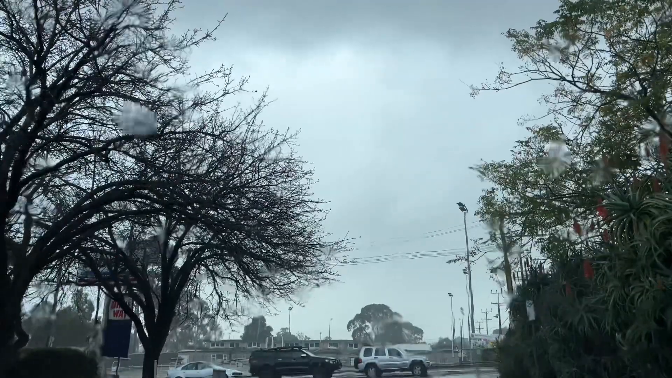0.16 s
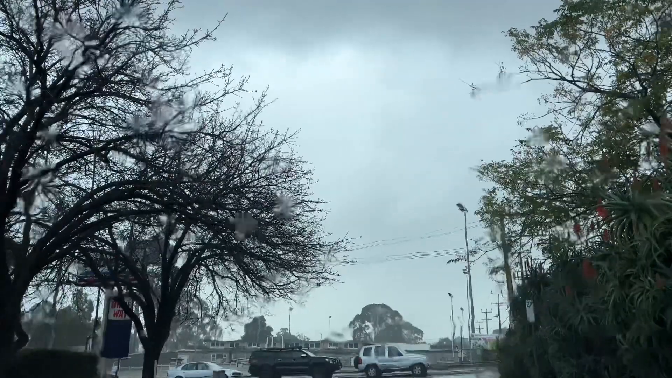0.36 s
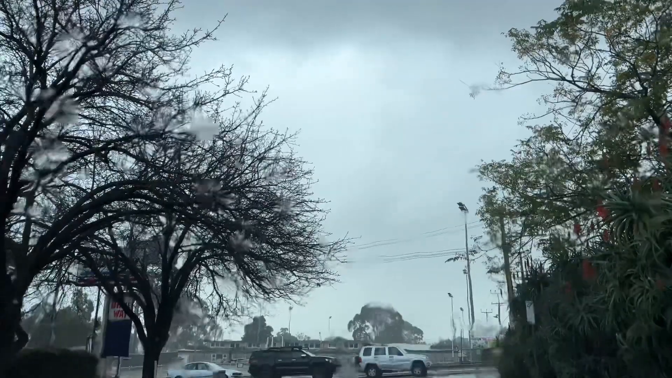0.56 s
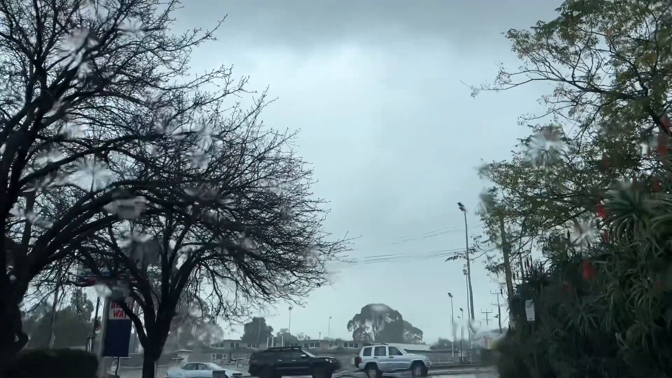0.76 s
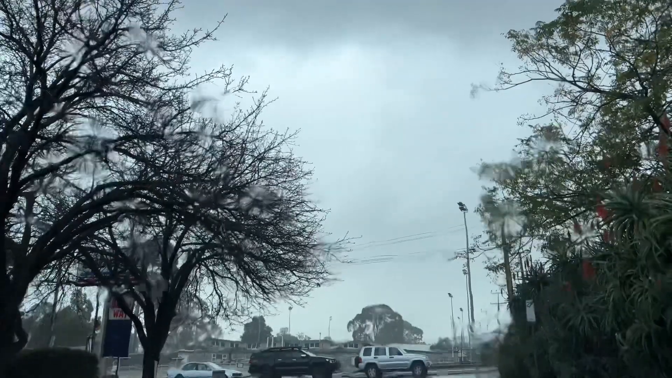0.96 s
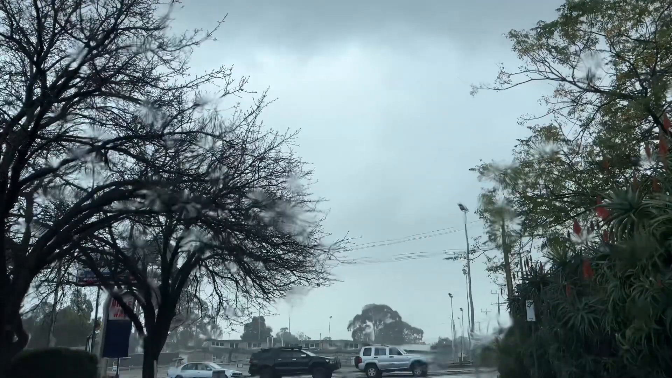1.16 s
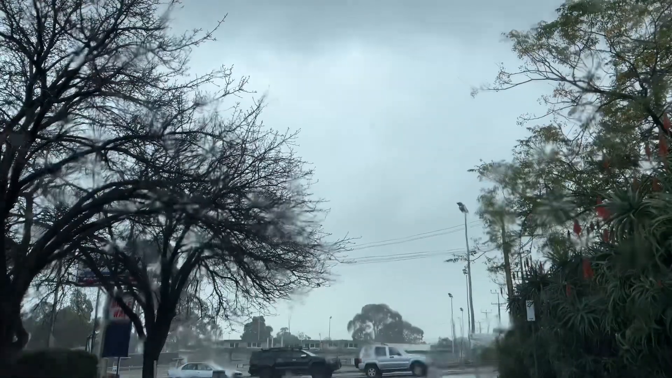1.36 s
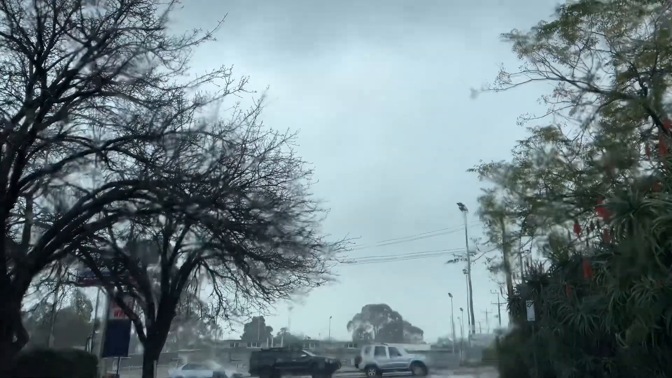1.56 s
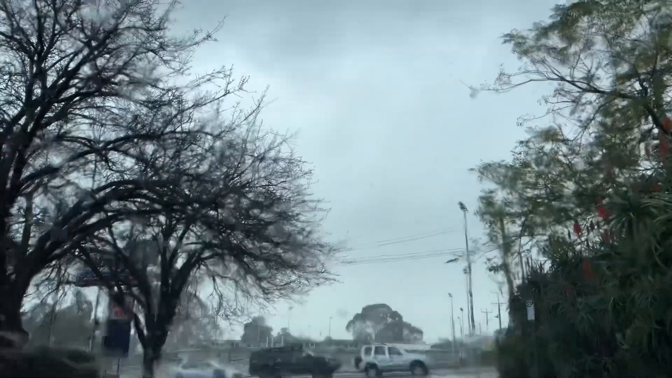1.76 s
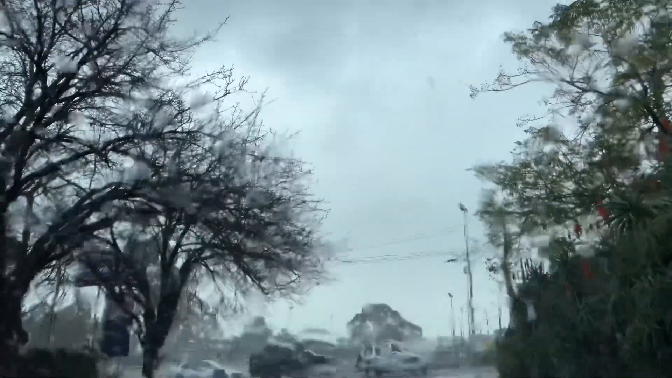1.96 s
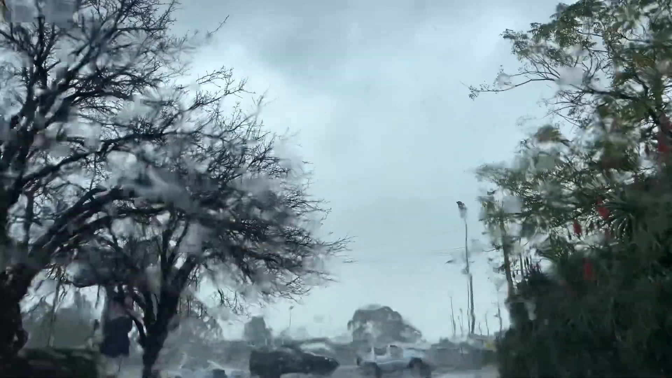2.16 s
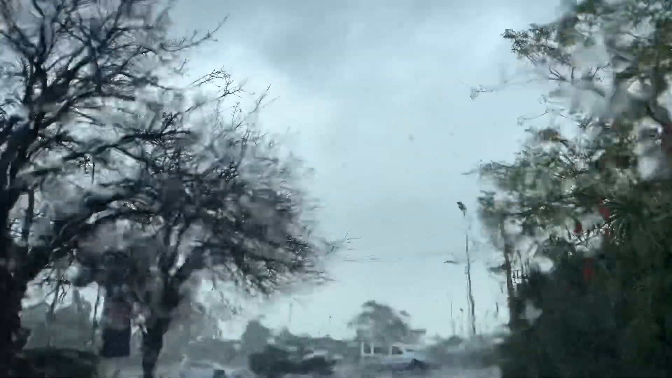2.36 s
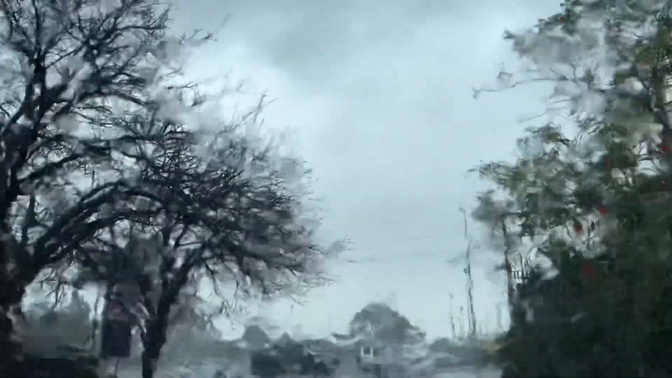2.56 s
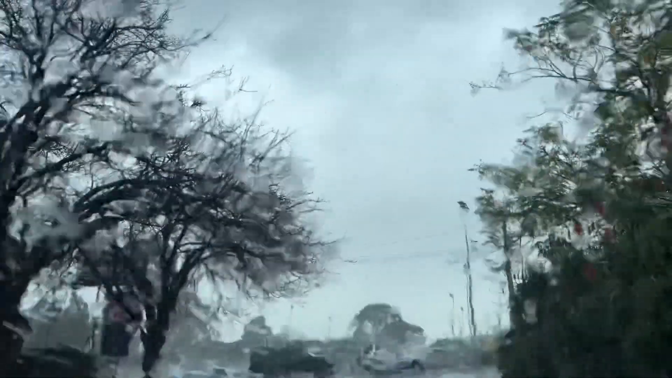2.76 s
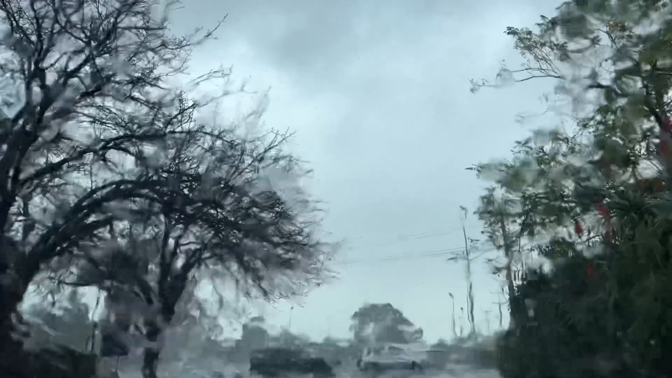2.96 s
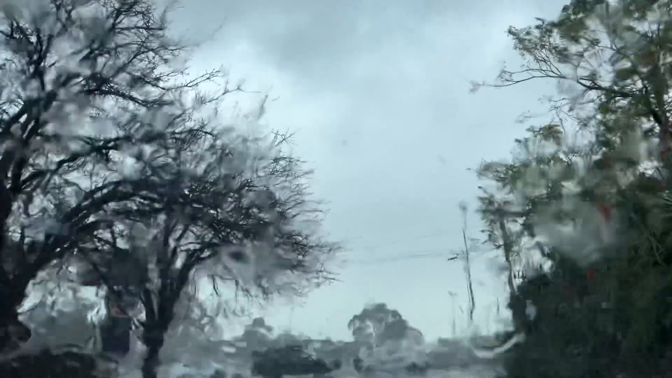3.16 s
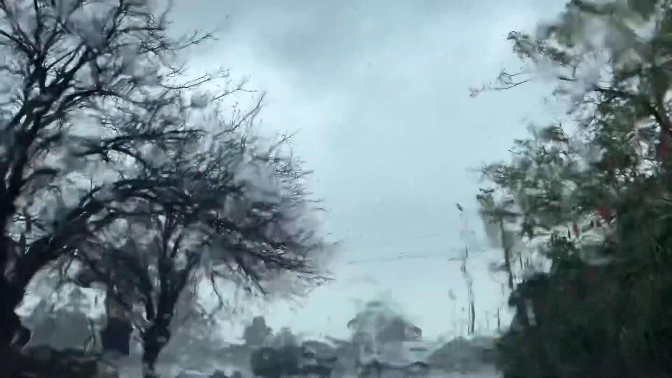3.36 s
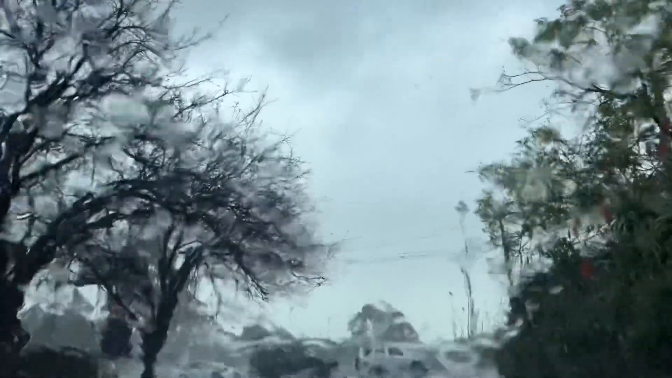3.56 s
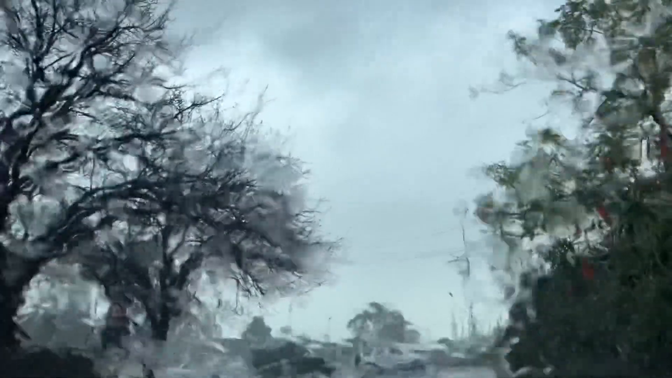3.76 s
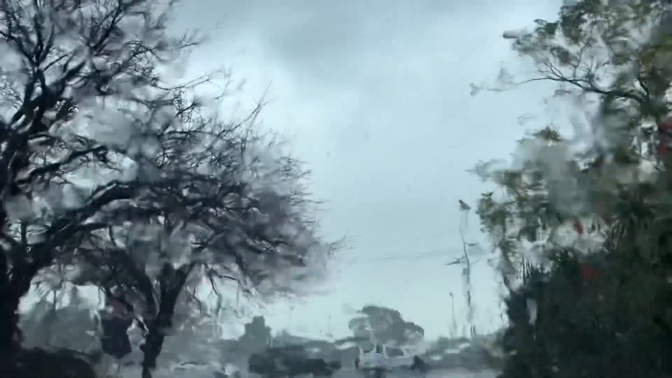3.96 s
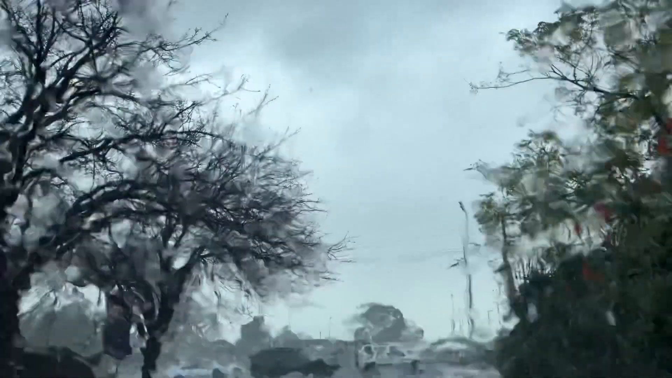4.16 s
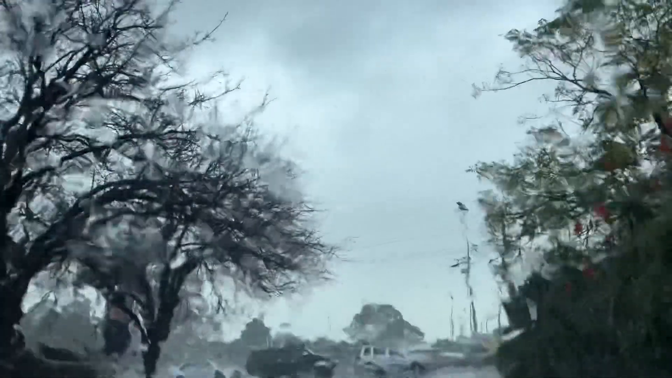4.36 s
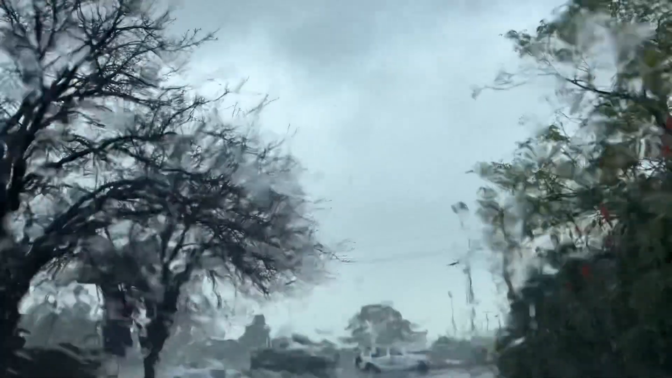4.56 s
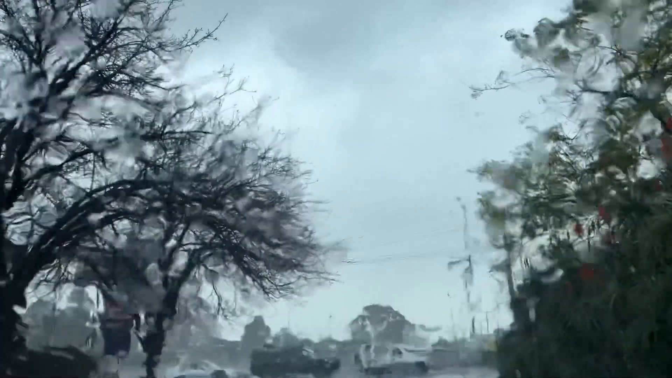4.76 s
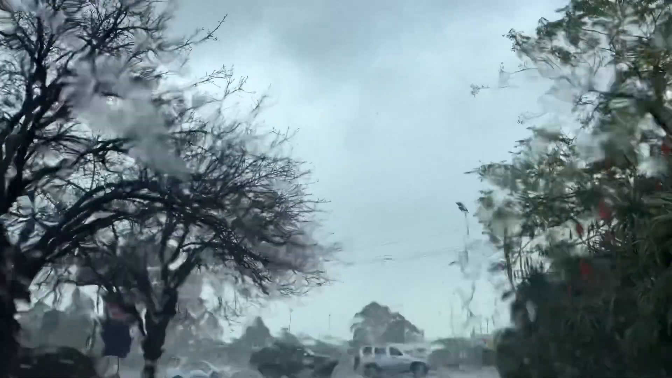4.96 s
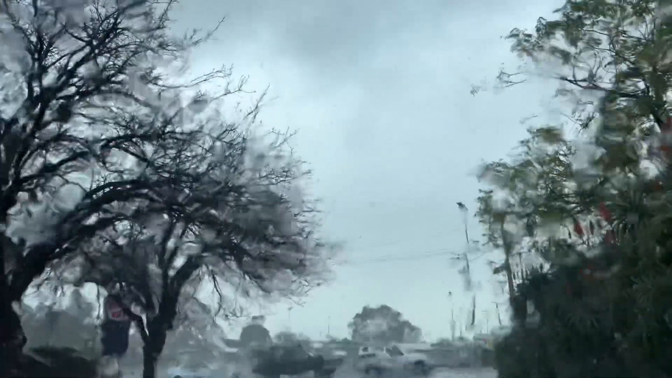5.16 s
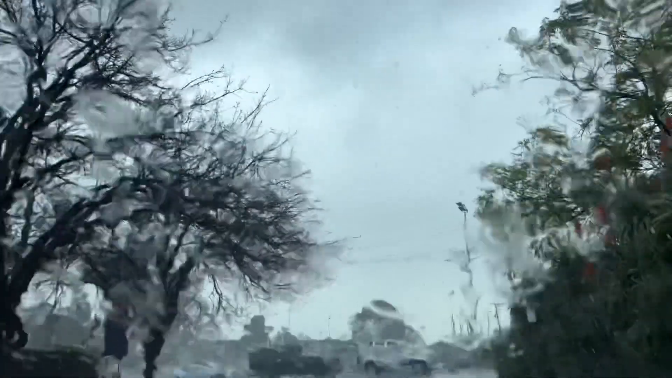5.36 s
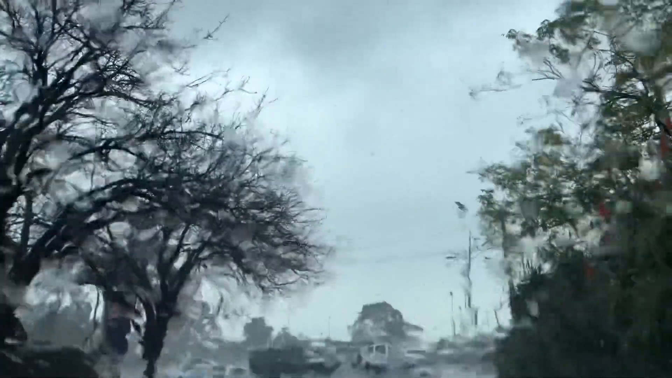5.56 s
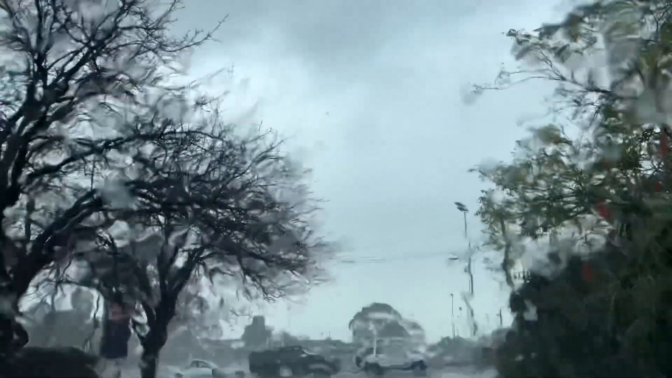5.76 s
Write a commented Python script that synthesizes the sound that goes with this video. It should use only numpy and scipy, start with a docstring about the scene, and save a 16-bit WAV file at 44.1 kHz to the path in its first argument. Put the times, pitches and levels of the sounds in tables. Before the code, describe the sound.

Wind-driven rain batters a car's roof and windscreen from within the cabin, swelling from near quiet to heavy drumming, then thinning while the roof keeps rumbling.

```python
"""Rain on a parked car, heard from inside: a light patter, then a gust throws dense drops that ease off.
Each drop is a tap that rings the shell and cabin air; large drops tick and knock on the glass and
heavy ones thud on the roof panel. Underneath lie filtered noise for wind rumble and outside wash, and
a low hum of two beating sines. Two microphone ports hear each sound alike or unlike by frequency."""
import sys
import numpy as np
from scipy import signal
from scipy.fft import rfft, irfft, next_fast_len
from scipy.io import wavfile

SR = 44100
rng = np.random.default_rng(int(sys.argv[2]) if len(sys.argv) > 2 else 0)


def wav_record(signal):
    """Record a signal, one row per channel, as 16-bit PCM in the file named by sys.argv[1]."""
    frames = np.transpose(np.atleast_2d(signal))
    bounded = np.clip(frames, -1, 1)
    # unit amplitude maps onto the largest positive 16-bit level
    quanta = np.round(bounded * 32767).astype(np.int16)
    wavfile.write(sys.argv[1], SR, quanta)


N = 256220  # length of the scene (samples)
SIZE = next_fast_len(N + 8192)  # spectra leave room for ringing past the end
HZ = np.fft.rfftfreq(SIZE, 1 / SR)
SPOTS = 10  # places on the shell that ring differently


def gain_of(db):
    """Decibels to amplitude."""
    return 10 ** (np.asarray(db) / 20)


def evened(x):
    """Scales to rms 1."""
    return x / np.sqrt(np.mean(x ** 2) + 1e-20)


def over_hz(table):
    """Columns of a spectrum table, drawn over log frequency."""
    f, *columns = np.transpose(table)
    return np.array([np.interp(np.log(HZ + 1), np.log(f + 1), c) for c in columns])


def over_time(table):
    """Columns of a curve table, one value a sample."""
    s, *columns = np.transpose(table)
    return np.array([np.interp(np.arange(N) / SR, s, c) for c in columns])


def causal(db):
    """Minimum-phase filter with this gain: its ringing comes only after the blow."""
    log_gain = np.log(gain_of(db))
    mirrored = np.concatenate([log_gain, log_gain[..., -2:0:-1]], -1)
    phase = -signal.hilbert(mirrored).imag[..., :len(HZ)]
    return np.exp(log_gain + 1j * phase)


def band(lo_hz, hi_hz, order=3):
    """Gain in dB of a band with sloped edges."""
    below = 1 + (lo_hz / (HZ + 1)) ** (2 * order)
    above = 1 + (HZ / hi_hz) ** (2 * order)
    return -10 * np.log10(below * above)


# likeness of the two ports by frequency: low and middle rows from the cabin's standing waves,
# treble rows simply opposed, then alike:
# (frequency [Hz], likeness [-1..1], share shifted a quarter turn [-1..1])
PORT_LIKENESS = [(60, .97, .07), (92, .2, 0), (122, .9, .18), (160, .68, .15), (200, .86, .24),
                 (265, .55, .3), (300, .78, .2), (410, .15, .15), (490, .45, .4), (535, .1, 0),
                 (580, -.65, -.1), (700, -.55, -.37), (890, -.72, 0), (980, -.05, .05), (1300, -.22, .42),
                 (1590, -.48, .2), (2150, .2, .16), (2900, -.1, -.18), (3400, -.24, -.06), (4300, .1, 0),
                 (9200, -.1, .1), (9800, -.95, 0), (11300, -.95, 0), (12200, .95, 0), (14800, .95, 0),
                 (15600, 0, 0)]


def ports(pair, colour):
    """Mixes two versions of a sound into left and right ports, with a set likeness at each frequency."""
    like, quarter = over_hz(PORT_LIKENESS)
    rest = np.sqrt(np.clip(1 - like ** 2 - quarter ** 2, 0, 1))
    a, b = pair
    right = (like + 1j * quarter) * a + rest * b
    return irfft(np.array([a, right]) * colour, SIZE)[:, :N]


# relative colour of shell and cabin at each port: (frequency [Hz], left gain [dB], right gain [dB])
CABIN_COLOUR = [(25, -85, -85), (60, -62, -62), (80, -58, -57), (105, -50, -52), (130, -49, -50.5),
                (210, -50, -47), (260, -49, -49), (345, -48.5, -48), (410, -50.5, -51), (480, -53, -49.5),
                (530, -55, -53.5), (580, -50, -52), (650, -56, -55), (750, -57, -57), (810, -54, -55),
                (900, -56, -56), (970, -53.5, -54), (1030, -55, -55), (1140, -56.5, -57), (1200, -54, -56),
                (1350, -57, -58), (1550, -56.5, -58), (1850, -62.5, -62), (2100, -60.5, -61),
                (2350, -62, -61.5), (2900, -59.5, -61), (3300, -62, -63), (4300, -67, -69.5),
                (5100, -69.5, -75), (5450, -74, -81), (5600, -68.5, -78), (6000, -70.5, -79),
                (7400, -82, -83), (8500, -79, -82), (9500, -83, -82), (10600, -82.5, -82.5),
                (12800, -89, -89), (14500, -91, -91), (15700, -97, -97)]


def through_cabin(band_db):
    """One band of the cabin colour: shared ringing, and each port's own gain."""
    cabin = over_hz(CABIN_COLOUR)
    return causal(cabin.mean(0) + band_db) * gain_of(cabin - cabin.mean(0))


def rings(t60, tap, count):
    """Taps on several spots, two versions each: a sharp start and a scatter of echoes dying 60 dB in t60."""
    t = np.arange(3000) / SR
    echoes = rng.standard_normal((count, 2, len(t))) * gain_of(-60 * t / t60)
    echoes[..., 0] = tap
    return echoes / np.linalg.norm(echoes, axis=2, keepdims=True)


def spot_colours(depth_db, octaves):
    """Each spot favours its own bands, a swell and dip recurring every so many octaves."""
    turns = np.log2(HZ + 50) / octaves + np.arange(SPOTS)[:, None] / SPOTS
    return gain_of(depth_db * np.sin(2 * np.pi * turns))


def spot_responses(t60, tap, depth_db):
    """Spectra of all spots, two versions; over all spots the colour is even and the versions unrelated."""
    a, b = np.swapaxes(rfft(rings(t60, tap, count=SPOTS), SIZE), 0, 1) * spot_colours(depth_db, 2.188)
    a = a / np.linalg.norm(a, axis=0)
    b = b - a * (a.conj() * b).sum(0)  # removes what the versions share
    return np.array([a, b / np.linalg.norm(b, axis=0)])


def flurries(slowest, fastest):
    """Random sway of rms 1 between two rates in Hz: rain and wind arrive in small sheets."""
    t = np.arange(0, N, 64) / SR
    rates = np.geomspace(slowest, fastest, 30)
    waves = sum(np.sin(2 * np.pi * (f * t + rng.random())) / np.sqrt(f) for f in rates)
    return np.interp(np.arange(N) / SR, t, evened(waves))


# clusters of drops:
# (time [s], lift of the drumming [dB], lift of its rattle [dB], lift of patter and spray [dB])
CLUSTERS = [(1.387, 0, 3, 2), (1.616, -2, -1, 5.5), (1.781, 1.5, 1, 0.7), (1.946, 3.3, 5.5, 2),
            (2.145, 1, 1, 1), (2.205, 4.5, 2.1, -1.5), (2.449, 1, 3.5, 2), (2.764, -0.9, 3.5, 0.5),
            (2.903, -3.5, 1, 0.8), (3.003, 2.9, -1, 1.5), (3.123, -0.5, 2, 1.5), (3.268, 2, 0, 0.5),
            (3.412, 2, 0.8, 2), (3.587, 0, 1.5, -1.5), (3.786, 0, 6, 1), (3.926, -1.5, 3, 2.5),
            (4.046, -0.5, -1.1, -0.5), (4.195, 0.5, 6.5, 2), (4.32, -2.5, 4.5, 2.0), (4.4, 0.5, 0, 0),
            (4.61, -0.5, 3, 1), (4.779, 3, 1, 3.5), (4.919, 4.5, 5.5, 1), (4.974, 2.5, 0.5, 2.0),
            (5.029, 2, 1.1, 1), (5.073, 3.5, 3, 0.3), (5.273, 1, 4, 1.7), (5.318, 0.5, -3, 0.5),
            (5.557, 2, 4.5, -0.5), (5.682, 5, 1, 0.6)]
CLUSTER_S = 0.011  # spread of a cluster to either side (s)


def clusters():
    """Each cluster shifts drumming, rattle and patter in one brief bell-shaped move."""
    s, *lifts = np.transpose(CLUSTERS)
    t = np.arange(0, N, 64) / SR
    bells = np.exp(-.5 * ((t - s[:, None]) / CLUSTER_S) ** 2)
    rough = np.array(lifts) @ bells
    return np.array([np.interp(np.arange(N) / SR, t, row) for row in rough])


def shower(level_db, band_db, per_s, spread_db, t60, tap, sheets_db, depth_db):
    """Random drops of uneven size, each ringing one of many spots, with a level that follows the gust."""
    falls = rng.random(N) < per_s / SR
    size = gain_of(spread_db * np.minimum(rng.exponential(1, N), 3.5)) * falls
    spot = rng.integers(0, SPOTS, N)
    on_spot = spot == np.arange(SPOTS)[:, None]
    taps = rfft(size * gain_of(sheets_db) * on_spot, SIZE)
    struck_shell = (taps * spot_responses(t60, tap, depth_db)).sum(1)
    heard = ports(struck_shell, through_cabin(band_db))
    return heard / np.sqrt(np.mean(heard.mean(0) ** 2)) * gain_of(level_db)


def tilted(x, edges_hz, boom_db, rattle_db):
    """Raises or lowers the bottom and the top of a sound over time."""
    z = rfft(x, SIZE)
    boom, below_rattle = (irfft(z / (1 + (HZ / hz) ** 6), SIZE)[:, :N] for hz in edges_hz)
    middle = below_rattle - boom
    rattle = x - below_rattle
    return boom * gain_of(boom_db) + middle + rattle * gain_of(rattle_db)


# the gust: (time [s], drumming of the shell [dB], its boom against that [dB],
# its rattle against that [dB], patter on the glass [dB]); clusters add to these
GUST_CURVE = [(0, -49.5, -2, -0.017, -57.5), (1.15, -58.5, 1, 0.28, -61.5), (1.2, -44.5, 0, 0, -62),
              (1.25, -45.5, -3, 2, -53.5), (1.3, -39, 7, 0.92, -49.5), (1.38, -38, 1, 0.025, -46),
              (1.56, -35, 3, -0.9, -42.5), (1.595, -31, 2, 2, -42.5), (1.635, -27, -5, -1.2, -44.5),
              (1.7, -28.5, 7, 0.96, -39), (1.735, -33.5, -5, 2.7, -36), (1.78, -26, 5, -0.18, -36),
              (1.88, -26.5, 1.5, -1.8, -35), (2.0, -23, 0.5, -1.4, -31.5), (2.18, -24, 2, 0.6, -29),
              (2.33, -20, -1, -0.79, -29.5), (2.43, -22, 5, 1.2, -30.5), (2.49, -24.5, 3.5, -0.31, -31.5),
              (2.55, -23.5, 3, -0.4, -31.5), (2.8, -25.5, 0, -1, -31.5), (2.9, -22.5, -1.5, -1.5, -31.5),
              (3.2, -24, 1, 0.018, -30), (3.6, -21.5, -2.5, -0.34, -28), (3.7, -24, 2.5, 1.1, -29),
              (3.8, -22, -6.5, -0.64, -27), (4.0, -19.5, 1, -0.19, -28.5), (4.12, -22.5, -3, 0.52, -28.5),
              (4.3, -23, 0.5, -0.4, -29), (4.43, -22.5, 2.5, 1, -29.5), (4.5, -26, 2, -0.17, -31),
              (4.58, -25.5, -5, -0.65, -35.5), (4.72, -28, 3, -0.39, -37.5),
              (4.85, -29.5, -0.5, 1.6, -38.5), (4.94, -26, 1, -1.7, -35.5),
              (5.2, -26.5, -1.5, -0.67, -36.5), (5.32, -25, 1.5, -0.88, -36),
              (5.52, -27, 2.5, -0.57, -37.5), (5.62, -26, -2, 0.35, -36.5), (5.81, -28, 3, -2.2, -40)]
BOOM_HZ, RATTLE_HZ = 170, 650  # the boom lies below, the rattle above
# colour of the patter: (time [s], gain of its low end [dB], gain of its treble [dB])
PATTER_COLOUR = [(0, 2, -5), (1.2, 4, 2), (1.3, -4, 1), (1.55, -1, -2.5), (1.6, -1, 1), (1.67, 1.5, 3.5),
                 (1.75, 1.5, 0), (2.0, -1, 0), (2.5, 0.5, 0.5), (2.9, -1.5, -1), (3.3, -1, -1),
                 (3.8, -1.5, 0.5), (4.2, -0.5, 0.5), (4.5, 1, -1), (4.8, 2, 1), (5.3, 3, -0.5),
                 (5.81, 4, 1)]
PATTER_HZ = 2000, 4000  # its low end lies below, its treble above
SPRAY_DB = -19.5  # fine spray against the patter


def rain():
    """Roof drums low, glass patters, spray ticks in the treble; all share sheets and clusters."""
    roof_db, boom_db, rattle_db, glass_db = over_time(GUST_CURVE)
    drum_lift, rattle_lift, glass_lift = clusters()
    sheets = flurries(10, 60)
    patter_db = glass_db + glass_lift
    roof = shower(roof_db + drum_lift, band(30, 1750), per_s=2000, spread_db=3.0,
                  t60=0.059, tap=5.1, sheets_db=0.23 * sheets, depth_db=4.47)
    glass = shower(patter_db, band(1480, 9300), per_s=1900, spread_db=3.1,
                   t60=0.077, tap=6.2, sheets_db=0.13 * sheets, depth_db=4.7)
    spray = shower(patter_db + SPRAY_DB, band(7550, 21000), per_s=3500, spread_db=1.3,
                   t60=0.051, tap=2.6, sheets_db=1.8 * sheets, depth_db=5.1)
    # the rattle takes its own cluster lift in place of the drumming's
    roof = tilted(roof, (BOOM_HZ, RATTLE_HZ), boom_db, rattle_db + rattle_lift - drum_lift)
    glass = tilted(glass, PATTER_HZ, *over_time(PATTER_COLOUR))
    return roof + glass + spray


# two close low tones that beat:
# (time [s], middle pitch [Hz], throbs per second [1/s], level of each tone [dB])
HUM_CURVE = [(0, 51.2, 9.3, -41.5), (.55, 51.2, 8.8, -41), (.75, 51.2, 8.6, -48), (1.0, 51, 7.6, -42),
             (1.3, 50.5, 6.6, -46), (1.45, 50.5, 6.6, -53), (5.81, 50, 6.6, -53)]


def hum():
    """Two equal tones: a middle pitch whose swing passes through zero at each throb."""
    hz, throbs, db = over_time(HUM_CURVE)
    middle = np.sin(2 * np.pi * np.cumsum(hz) / SR)
    swing = np.sin(np.pi * np.cumsum(throbs) / SR)
    return 2 * middle * swing * gain_of(db)


# steady wash from outside, with a thin hiss near the left port; relative colour only:
# (frequency [Hz], left gain [dB], right gain [dB])
WASH_COLOUR = [(40, -80, -80), (75, -64, -63), (110, -71, -71), (150, -71.5, -69.5), (215, -77, -73),
               (310, -75, -72.5), (440, -77, -77), (520, -84, -81), (750, -84, -82), (1070, -79, -80),
               (1350, -84, -85), (1700, -79.5, -81), (1850, -83, -85), (2000, -81, -83), (2150, -83, -85.5),
               (2400, -87, -86.5), (3100, -86.5, -86.5), (5300, -99, -108), (6900, -90, -107),
               (7350, -92, -110), (7700, -100, -111), (8500, -97, -110), (9600, -106, -107),
               (11000, -107, -107), (15600, -115, -115)]
WASH_DB = -45.5  # rms level


def wash():
    """Smooth noise through the shell."""
    noise = rfft(rng.standard_normal((2, N)), SIZE)
    return gain_of(WASH_DB) * evened(ports(noise, gain_of(over_hz(WASH_COLOUR))))


SHAKE_DB, SHAKE_LUMPS_DB = -16, -1  # wind shaking the body, against the drumming; its unevenness


def rumble():
    """Wind shakes the body near the lowest cabin resonance, as hard as the gust blows."""
    noise = rfft(rng.standard_normal((2, N)), SIZE)
    shake = ports(noise, gain_of(band(45.0, 53, order=5)))
    drumming_db = over_time(GUST_CURVE)[0]
    lumps_db = SHAKE_LUMPS_DB * flurries(1.29, 5)
    return evened(shake) * gain_of(drumming_db + SHAKE_DB + lumps_db)


def struck(t60, tap, lo_hz, hi_hz):
    """One ringing response for each band given, peak 1."""
    out = rings(t60, tap, count=len(lo_hz))
    for k, edges in enumerate(zip(lo_hz, hi_hz)):
        out[k] = signal.sosfilt(signal.butter(3, edges, "band", fs=SR, output="sos"), out[k])
    return out / abs(out).max(axis=2, keepdims=True)


def placed(s, db, side_db, responses):
    """Single blows at their moments, with a lean between the two versions that feed the ports."""
    pair = np.zeros((2, SIZE))
    for at, size, lean, ring in zip(s, gain_of(db), side_db, responses):
        sides = gain_of([[lean / 2], [-lean / 2]])
        pair[:, round(at * SR):][:, :ring.shape[1]] += size * ring * sides
    return rfft(pair)


# large drops on the glass, levels before the cabin colours them:
# (time [s], tick peak [dB], knock peak [dB], knock pitch [Hz], knock's lean to the left [dB])
LARGE_DROPS = [(1.2401, -47, -50, 2970, 1), (1.2777, -60, -36, 2950, 2), (1.3864, -55, -34, 2800, -3),
               (1.4508, -62, -30, 2870, 0), (1.5823, -44, -36, 2650, 4), (1.594, -46, -37, 5000, 0),
               (1.6279, -50, -29, 2200, 1.5), (1.703, -48, -25, 2880, -1), (1.766, -45, -24, 3020, 7),
               (1.888, -27, -38, 2990, -2), (1.9395, -34, -20.5, 2940, 3), (2.044, -45, -18, 1290, 0),
               (2.13, -24, -29, 2690, 0), (2.1909, -30, -22, 2870, -5), (2.438, -34, -14, 1250, 4),
               (2.5, -26.5, -40, 2850, -2), (2.6374, -33, -21.5, 2600, 4), (2.6855, -30, -19, 2920, 3),
               (2.747, -28, -30, 2940, 1.5), (2.9008, -44, -19, 2620, 9), (3.1217, -43, -14.5, 3600, 0),
               (3.257, -45, -32, 5800, 4), (3.32, -23, -22, 2680, 3), (3.5728, -23.5, -15, 1180, -10),
               (3.597, -22, -19, 2980, -11), (3.7663, -40, -16, 2540, 0), (3.7843, -18, -23, 5040, .6),
               (3.7904, -22, -27, 2850, -6), (3.898, -45, -16, 1200, -2), (3.919, -40, -20, 2300, -4),
               (3.928, -26, -17.5, 4000, 1), (3.9418, -17, -18, 1200, -1), (3.974, -36, -20, 4000, 0),
               (4.019, -18, -17, 2650, -8), (4.042, -29, -15, 2230, 2), (4.049, -19.5, -14, 3300, -3),
               (4.054, -22, -26, 5500, -3), (4.1337, -24, -14, 2830, 2), (4.1771, -40, -18, 2320, -5),
               (4.3077, -40, -29, 2620, -1), (4.3504, -27, -18, 2850, -1), (4.4604, -45, -24, 1360, -5),
               (4.9718, -45, -26, 2910, 2), (5.0202, -45, -23, 2830, 1), (5.25, -48, -25, 1190, 11),
               (5.302, -43, -25, 2290, -2), (5.358, -45, -29, 2320, 0), (5.2697, -36, -24, 2600, 3),
               (5.531, -28, -39, 2800, -4), (5.729, -24, -27, 5300, -2)]
TICK_HZ, TICK_T60 = (6400, 11700), 0.029  # band (Hz) and ring (s) of a tick
KNOCK_SPAN, KNOCK_T60 = 1.25, .055  # a knock fills pitch / span to pitch x span; its ring (s)


def large_drops():
    """A short bright tick and a duller knock, each dying within the padded cabin."""
    s, tick_db, knock_db, hz, side_db = np.transpose(LARGE_DROPS)
    tick_lo, tick_hi = np.outer(TICK_HZ, np.ones(len(s)))
    ticks = placed(s, tick_db, 0 * s, struck(TICK_T60, 6.4, tick_lo, tick_hi))
    knocks = placed(s, knock_db, side_db, struck(KNOCK_T60, 1.8, hz / KNOCK_SPAN, hz * KNOCK_SPAN))
    cabin = over_hz(CABIN_COLOUR)
    return ports(ticks + knocks, gain_of(cabin - cabin.mean(0)))


ECHO_S, ECHO_DB = (.003, .025), -29  # span of the first echoes (s) and level of each


def panes(x, count=14):
    """A few quick echoes between the windows give the middle range its fine resonances."""
    delay = rng.uniform(*ECHO_S, (count, 1))
    sign = rng.choice([-1., 1.], (count, 1))
    arrivals = (sign * np.exp(-2j * np.pi * HZ * delay)).sum(0)
    echoes = arrivals * gain_of(ECHO_DB + band(700, 6000))
    return irfft(rfft(x, SIZE) * (1 + echoes), SIZE)[:, :N]


# heavy drops on the roof, before onset, decay and band soften them:
# (time [s], thud level [dB], lowest pitch [Hz])
ROOF_THUDS = [(1.617, -18, 413), (1.776, -26, 122), (1.985, -16, 312), (2.22, -11.5, 202),
              (2.291, -13, 292), (2.325, -12, 270), (2.355, -14, 370), (2.411, -18, 220), (2.46, -12, 490),
              (2.521, -17, 170), (1.649, -18, 327), (2.379, -31, 277), (2.479, -8, 190), (2.847, -13, 348),
              (3, -8, 254), (3.259, -11.5, 363), (3.355, -14, 342), (3.576, -15, 282), (3.717, -9, 151),
              (3.956, -17, 346), (4.91, -27, 224), (5.225, -18, 316), (5.364, -23, 194), (5.659, -14, 192),
              (3.781, -9, 300), (3.819, -7.5, 314), (4.355, -14, 297), (4.419, -13.5, 363),
              (4.57, -37, 314), (5.048, -20, 279), (5.31, -14, 302), (5.548, -13, 188)]


def thuds():
    """The roof panel swings a few times near its struck pitch, up to 5 % above it."""
    s, db, hz = np.transpose(ROOF_THUDS)
    t = np.arange(2000) / SR
    pitch = hz[:, None, None] * rng.uniform(1.0, 1.05, (len(s), 2, 1))
    onset = np.minimum(t / 0.0039, 1)
    decay = gain_of(-60 * t / 0.034)
    swing = np.sin(2 * np.pi * pitch * t) * onset * decay
    return ports(placed(s, db, 0 * s, swing), gain_of(band(90, 1500)))


def scene():
    """Everything at the two ports; only rain and large drops echo between the windows."""
    return panes(rain() + large_drops()) + thuds() + rumble() + hum() + wash()


EDGE_HZ = 15784  # the treble ends here (Hz)


def record(dry):
    """A steep low-pass cuts off the treble."""
    low_pass = signal.firwin(1501, EDGE_HZ, window=("kaiser", 9), fs=SR)
    return signal.oaconvolve(dry, low_pass[None], "same")


dry = scene()
out = record(dry)
wav_record(out)
```